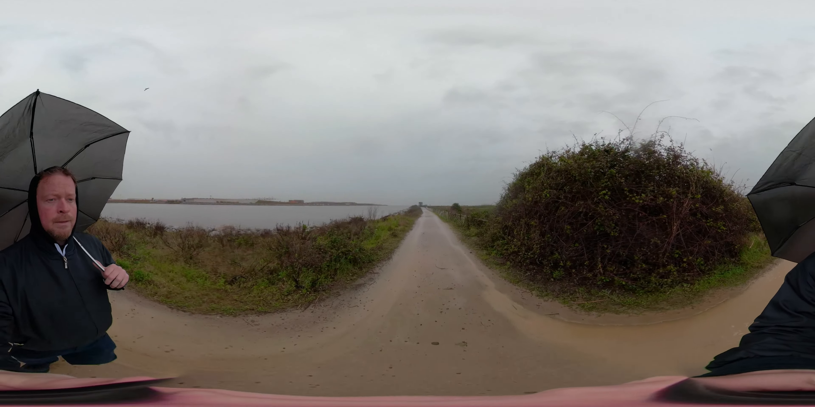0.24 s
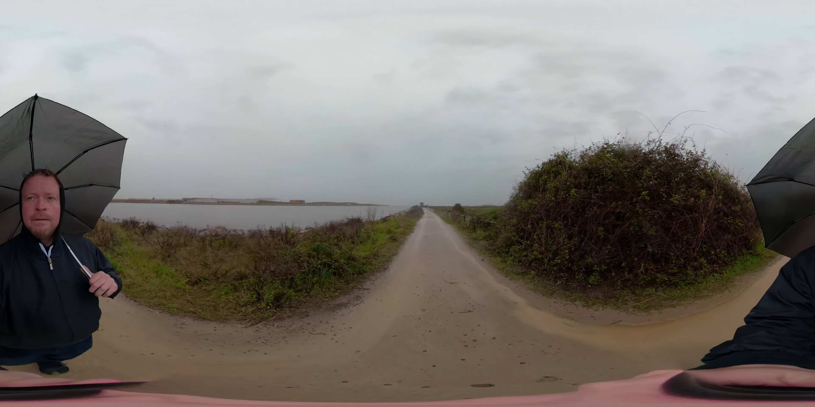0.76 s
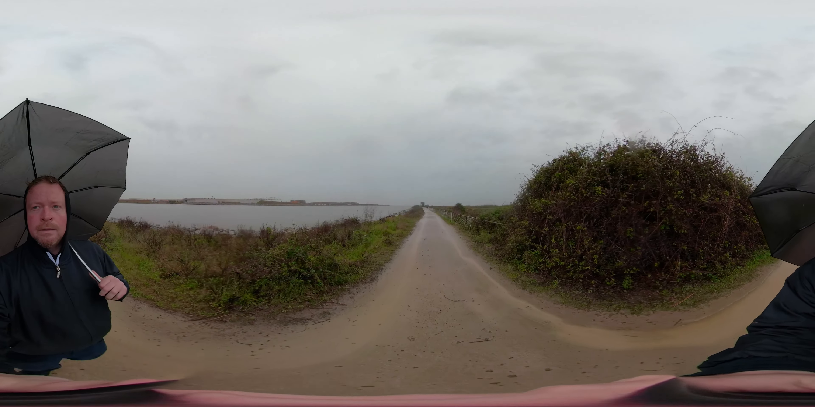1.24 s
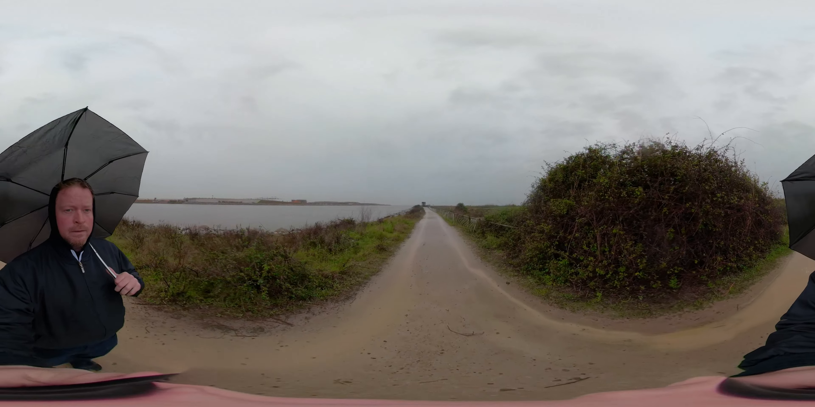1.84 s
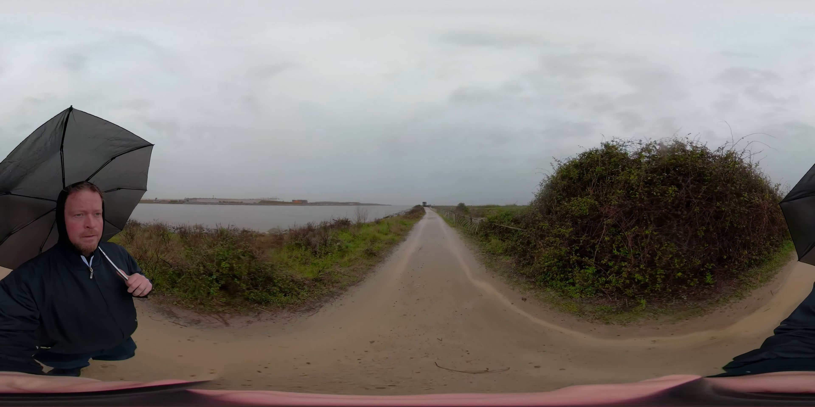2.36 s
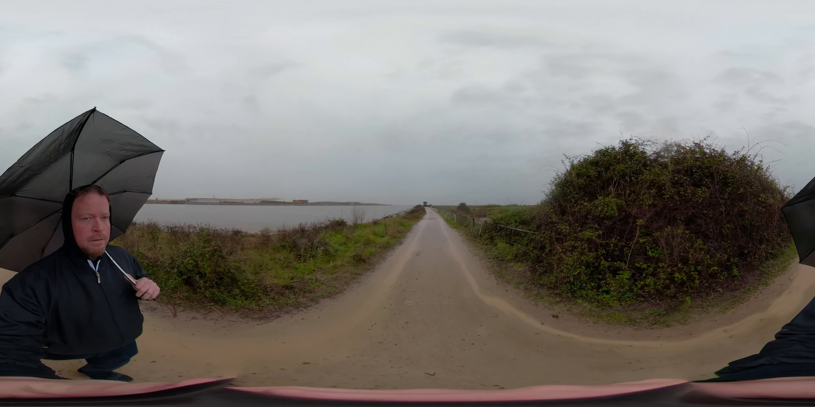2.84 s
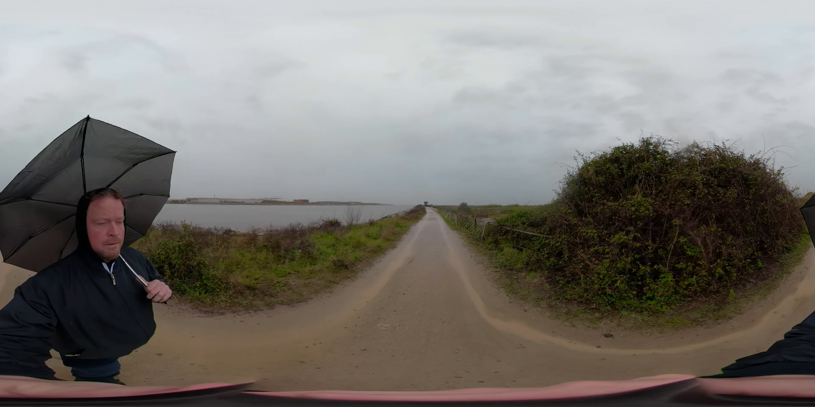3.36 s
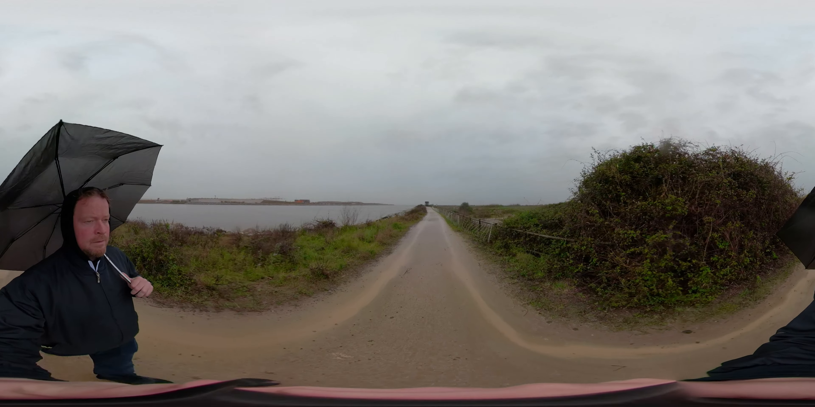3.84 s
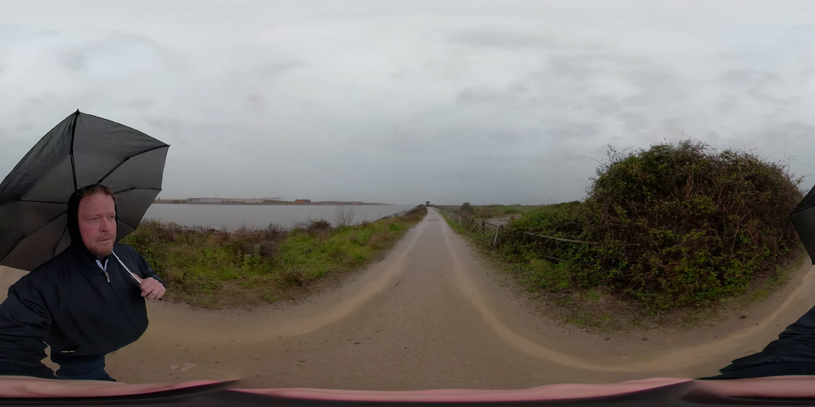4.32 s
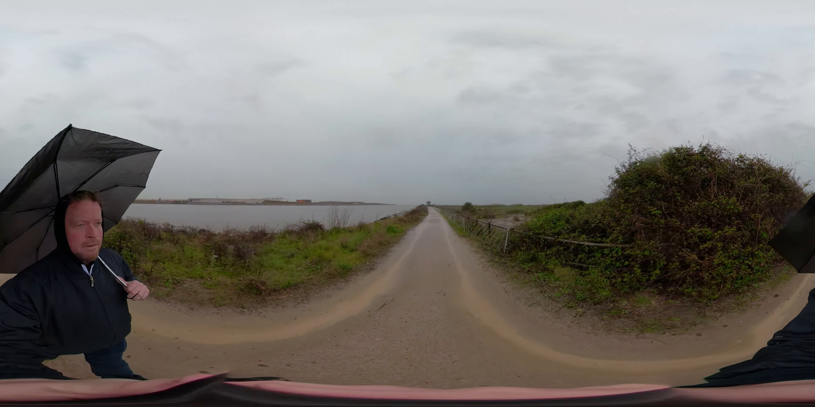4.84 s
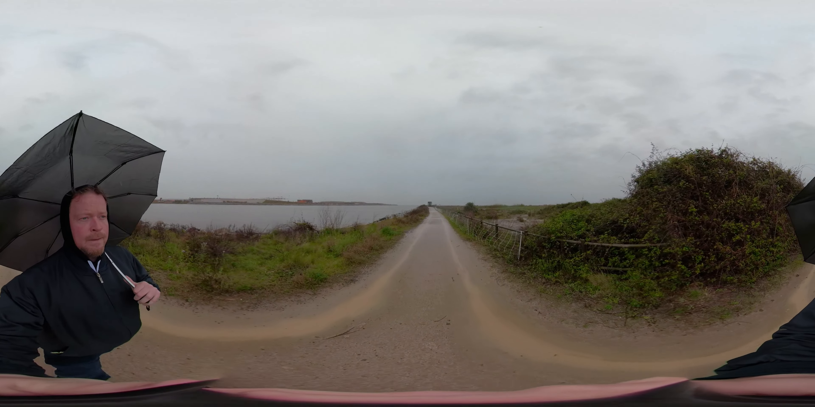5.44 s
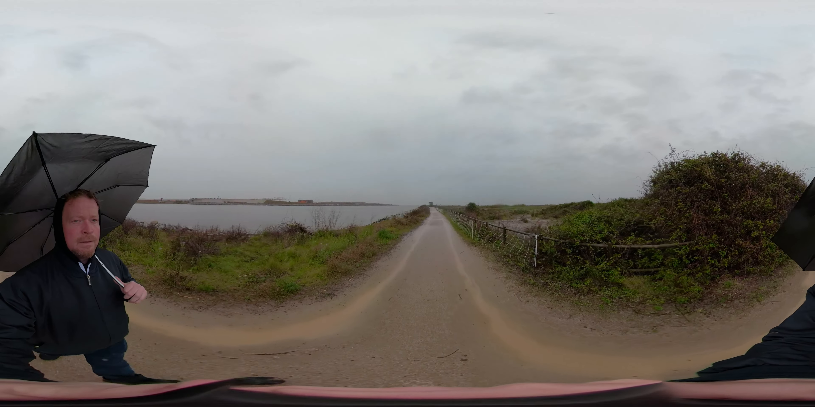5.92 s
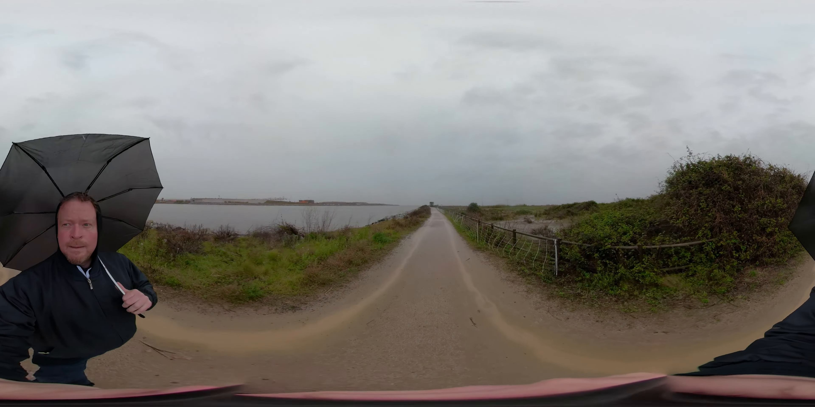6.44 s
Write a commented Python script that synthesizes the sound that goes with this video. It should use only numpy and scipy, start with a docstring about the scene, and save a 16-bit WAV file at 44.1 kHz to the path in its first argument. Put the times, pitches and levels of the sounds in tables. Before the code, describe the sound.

Raindrops tap on a close umbrella over low wind and faint steps, dulling to a patter after one soft bump.

```python
"""A walk by the water under an umbrella, in light rain. From the start the wet ground hisses, far wind
and water make a soft wash, wind rumbles on the microphone and the stretched canopy drones.
Drops tick on the cloth, and shoes scuff softly as they crush the wet sand of the track.
A little after five seconds comes one soft bump and the umbrella is turned:
the ticks dull into a patter, and the rumble grows as the microphone loses its shelter."""
import sys
import numpy as np
from scipy import signal
from scipy.fft import rfft, irfft
from scipy.io import wavfile
from scipy.ndimage import uniform_filter1d

SR = 44100
rng = np.random.default_rng(int(sys.argv[2]) if len(sys.argv) > 2 else 0)


def generate_wav(sig):
    """Save sig (samples, or channels by samples) to the path in sys.argv[1] as 16-bit PCM at SR."""
    pcm = np.round(np.clip(np.atleast_2d(sig).T, -1, 1) * 32767).astype(np.int16)
    wavfile.write(sys.argv[1], SR, pcm)


N = 294588
TIME = np.arange(N) / SR

# how far the umbrella is turned: (time [s], share of a full turn [0-1])
TURN_SHARE = [(0, 0.01), (5.3, 0.04), (5.6, 0.47), (5.85, 0.7), (6.68, 0.82)]
# a full turn lifts the middle pitches and takes away treble: (frequency [Hz], change [dB])
TURN_COLOUR = [(500, 2), (2000, 4), (3000, 6), (3700, 2.5), (4600, -9.5), (5500, -20.5), (6500, -22.5),
               (7500, -30), (8500, -26), (11000, -23), (12400, -4.5), (14000, -15)]


def gain_of(db):
    """Turns decibels into a factor to multiply a sound by."""
    return 10 ** (np.asarray(db) / 20)


def unit_level(x):
    """Scales a signal to an average (rms) size of 1."""
    return x / np.sqrt(np.mean(x ** 2) + 1e-20)


def at_hz(rows, hz):
    """Reads a table between its frequencies, on a scale of octaves."""
    row_hz, value = np.transpose(rows)
    return np.interp(np.log(hz + 1), np.log(row_hz + 1), value)


def at_time(rows, t):
    """Reads a table between its times, along straight lines."""
    return np.interp(t, *np.transpose(rows))


def add(mix, start_s, sound):
    """Adds a sound into the mix at its start time."""
    part = mix[max(round(start_s * SR), 0):][:len(sound)]
    part += sound[:len(part)]


def turned(t):
    """How far the umbrella is turned at these times, as a column."""
    return at_time(TURN_SHARE, t)[:, None]


def patches(grid, frames, bands):
    """Blurs a random grid of time and frequency into soft patches."""
    return unit_level(uniform_filter1d(uniform_filter1d(grid, frames, axis=0), bands, axis=1))


def noise(colour, patchy_db, size):
    """Noise with the tone colour given by colour(t, hz) in dB, plus random louder and softer patches."""
    hop = size // 4
    t, hz = np.arange(N // hop + 5) * hop / SR, np.fft.rfftfreq(size, 1 / SR)
    real, imag, grid = rng.standard_normal((3, len(t), len(hz)))
    spectrum = (real + 1j * imag) * gain_of(colour(t, hz) + patchy_db * patches(grid, 10, 8))
    return unit_level(signal.istft(spectrum.T, nperseg=size, noverlap=size - hop)[1][:N])


def steadied(x, size):
    """Evens out the slow swells of a noise."""
    return x / np.sqrt(uniform_filter1d(x ** 2, size=size) + 1e-9)


def ground_hiss(db=1, turn_db=2.5):
    """Rain on the track and bushes, so far off that the drops blend into a hiss."""
    # tone colour of the hiss: (frequency [Hz], relative level [dB])
    colour = [(800, -17.5), (2000, -4), (3000, -5.5), (4300, -10.5), (5000, -5), (5600, 3.5), (6400, -7),
              (7200, -2), (8000, -17.5), (8800, -24.5), (12300, -24.5), (13300, -61)]
    # its slow rise and fall: (time [s], relative level [dB])
    level = [(0, -73.5), (1, -72), (2, -73), (3, -72.5), (4, -71.5), (5.2, -72), (5.8, -75), (6.68, -70)]
    hiss = noise(lambda t, hz: at_hz(colour, hz) + turned(t) * at_hz(TURN_COLOUR, hz), patchy_db=2, size=512)
    level_db = db + at_time(level, TIME) + turn_db * at_time(TURN_SHARE, TIME)
    return steadied(hiss, size=4000) * gain_of(level_db)


def far_wash(db=1.5, hump_db=4, hump_octaves=0.51):
    """Far wind and water blend into a wash, with a louder band that drifts in pitch."""
    # tone colour of the wash: (frequency [Hz], relative level [dB])
    colour = [(100, 1.5), (300, -2), (550, 1.5), (900, -0.5), (1500, -4.5), (2100, -14.5), (3000, -25.5),
              (5000, -69.5), (9000, -85)]
    # its slow rise and fall: (time [s], relative level [dB])
    level = [(0, -57.5), (0.65, -56.5), (1.47, -60), (2.7, -60.5), (3.6, -60), (5.5, -61.5), (6.68, -58)]
    # middle of the louder band: (time [s], frequency [Hz])
    hump_pitch = [(0, 990), (1, 1200), (2, 1350), (2.6, 910), (3.1, 806), (5, 860), (6.68, 654)]

    def drifting_colour(t, hz):
        octaves = np.log2((hz + 1) / at_time(hump_pitch, t)[:, None])
        return at_hz(colour, hz) + hump_db * np.exp(-(octaves / hump_octaves) ** 2)
    return noise(drifting_colour, patchy_db=1.3, size=1024) * gain_of(db + at_time(level, TIME))


def wind(rumble_db=-46, flutter_db=-50, turn_rumble_db=4, turn_flutter_db=5):
    """Swirls of air buffet the microphone, harder once the turned canopy stops sheltering it."""
    # the deep rumble: (frequency [Hz], relative level [dB])
    rumble_colour = [(10, -7), (25, 2), (40, 9.5), (52, 15), (68, 9.5), (90, 6), (130, -7), (250, -61),
                     (1000, -120)]
    # the flutter above it: (frequency [Hz], relative level [dB])
    flutter_colour = [(50, -8), (95, -1), (125, -5.5), (160, -5), (220, -12.5), (320, -19), (500, -25.5),
                      (1000, -50), (5000, -120)]
    # strength of the breeze: (time [s], relative level [dB])
    breeze = [(0, 1.5), (.6, 0), (1.3, 1), (2.4, 0), (3.5, 0), (5.4, -1.5), (6, 2), (6.68, 0)]
    rumble = noise(lambda t, hz: at_hz(rumble_colour, hz), patchy_db=3.5, size=8192)
    flutter = noise(lambda t, hz: at_hz(flutter_colour, hz), patchy_db=2, size=2048)
    turn = at_time(TURN_SHARE, TIME)
    rumble = steadied(rumble, size=18000) * gain_of(rumble_db + turn_rumble_db * turn)
    flutter = steadied(flutter, size=8000) * gain_of(flutter_db + turn_flutter_db * turn)
    return (rumble + flutter) * gain_of(at_time(breeze, TIME))


def canopy_drone(db=-1, note_hz=78.2, width_hz=3.5):
    """Wind and rain keep the stretched canopy ringing at its lowest note, like a drum skin."""
    # strength of the drone: (time [s], relative level [dB])
    level = [(0, -45), (.7, -50), (1.4, -48.5), (2.1, -42.5), (3.2, -47), (4.4, -41), (5.2, -41.5),
             (5.5, -45), (6.68, -43.5)]
    ring = noise(lambda t, hz: -20 * np.log10(1 + ((hz - note_hz) / width_hz) ** 2),
                 patchy_db=-0.5, size=16384)
    return steadied(ring, size=6000) * gain_of(db + at_time(level, TIME))


def drops_on_cloth(drops, sharpness, sharp_spread=0.75, tilt_db=3, uneven_db=2.2,
                   ring_db=5, ring_width_hz=550, dull_db=4):
    """Each drop makes a bright tick and a dull pat, then ripples briefly across the cloth."""
    # the tick, as the drop hits: (frequency [Hz], relative level [dB])
    tick_colour = [(1500, -39.5), (3000, -11), (4300, -9), (5100, 1), (6400, -0.5), (7300, -1),
                   (8000, -8.5), (8700, -20), (10500, -22.5), (12500, -23), (14000, -35.5), (16000, -61)]
    # the pat, as the cloth gives way: (frequency [Hz], relative level [dB])
    pat_colour = [(100, -10.5), (300, -7), (700, 3.5), (1100, 2), (1500, 6.5), (2200, 1), (3000, -2.5),
                  (4200, -12), (6000, -39), (10000, -58.5)]
    # extra treble of a drop that lands squarely: (frequency [Hz], boost per step of sharpness [dB])
    square_hit = [(8000, 1), (10000, 1.5), (13000, 3.5), (16000, 9)]
    times, tick_db, pat_db, ring_hz = np.transpose(drops)
    size, lead = 512, 96  # samples per drop, and how many come before the hit
    hz, age = np.fft.rfftfreq(size, 1 / SR), (np.arange(size) - lead) / SR
    chance = rng.standard_normal((len(times), 2, size))
    ripples = chance * (age > 0)
    octaves = np.log2(np.clip(hz, 700, 9000) / 3000)
    # tight and slack spots sound brighter or duller, each with its own peaks and dips
    tilt = tilt_db * chance[:, 0, :1] * octaves
    uneven = uneven_db * unit_level(uniform_filter1d(chance[:, 1, :len(hz)], size=22, axis=1))
    treble = (sharpness + sharp_spread * chance[:, 0, 1:2]) * at_hz(square_hit, hz)
    spot_db = tilt + uneven + treble + turned(times) * at_hz(TURN_COLOUR, hz)
    ring = ring_db / (1 + ((hz - ring_hz[:, None]) / ring_width_hz) ** 2)
    dulling = dull_db * turned(times) * octaves

    def hit(colour_db, ripple, peak_db, fade_s):
        click = (age == 0) + ripple * np.exp(-abs(age) / fade_s)
        wave = irfft(rfft(click) * gain_of(colour_db + spot_db))
        return wave * (gain_of(peak_db) / abs(wave).max(axis=1))[:, None]

    ticks = hit(at_hz(tick_colour, hz) + ring, 0.04 * ripples[:, 0], tick_db, fade_s=0.0016)
    pats = hit(at_hz(pat_colour, hz) - dulling, 0.075 * ripples[:, 1], pat_db, fade_s=0.0022)
    out = np.zeros(N)
    for hit_s, wave in zip(times, (ticks + pats) * signal.windows.tukey(size, 0.2)):
        add(out, hit_s - lead / SR, wave)
    return out


def fine_rain(per_s=180, least_db=-62, spread_db=9, range_db=21,
              pat_db=-6, vary_db=12, turn_tick_db=-11.5, turn_pat_db=6):
    """Many small drops land all over the canopy; the larger they are, the rarer."""
    # strength of the fine rain: (time [s], relative level [dB])
    shower = [(0, 4.5), (.7, 3), (1.4, 2), (2, 1.5), (2.7, -2), (3.3, -1.5), (3.7, 3), (4.4, 4), (5.5, 5),
              (5.9, 3), (6.68, 6)]
    when, chance, size, tone, pitch = rng.random((4000, 5)).T
    times = when * N / SR
    reach = 1 - np.exp(-range_db / spread_db)  # caps the size of a drop
    level = least_db - spread_db * np.log(1 - reach * size) + at_time(shower, times)
    turn = at_time(TURN_SHARE, times)
    tick_level = level + turn_tick_db * turn
    pat_level = level + pat_db + turn_pat_db * turn + vary_db * (tone - 0.5)
    ring_hz = 5100 + 1900 * pitch ** 2
    drops = np.transpose([times, tick_level, pat_level, ring_hz])
    lands = chance < per_s * N / SR / len(times)
    return drops_on_cloth(drops[lands], sharpness=-0.8)


def canopy_push(pace_s):
    """The canopy is pushed in and swings back more slowly: one lopsided wave."""
    progress = np.arange(2500) / SR / pace_s
    wave = np.gradient(progress ** 3 * np.exp(-progress))
    return wave / wave.max()


def large_drops(thud_db=-7, thud_s=0.00085, hollow_db=-10, hollow_hz=800, hollow_s=0.0059):
    """Big, close drops dent the cloth with a small thud, and ring hollow once it is turned."""
    # the big drops: (time [s], tick level [dB], pat level [dB], pitch of the tick's ring [Hz])
    drops = [(0.036, -36, -34.5, 5760), (0.1144, -33, -36.5, 5500), (0.121, -36, -40, 5600),
             (0.193, -35, -48, 5900), (0.5025, -15, -24.5, 5540), (0.7755, -37.5, -40.5, 6200),
             (0.8512, -34, -38.5, 6740), (0.893, -33, -45, 5500), (1.2968, -36.5, -37.5, 5300),
             (1.382, -34.5, -34.5, 6100), (1.4299, -38, -39, 5300), (1.5181, -35, -45, 5700),
             (1.5597, -31.5, -39, 6040), (1.8191, -37.5, -41.5, 5900), (1.8682, -28, -36, 6340),
             (2.9654, -37.5, -47, 6000), (2.9998, -38, -40, 5800), (3.0276, -24, -39, 6100),
             (3.1216, -39, -43, 5400), (3.5284, -33.5, -37.5, 5700), (3.6171, -39, -42, 5600),
             (3.8253, -34, -41, 5900), (3.9131, -38, -35, 5500), (4.5227, -39, -45, 6600),
             (4.7519, -36.5, -41, 6500), (4.964, -33, -40, 5900), (5.0129, -35.5, -47, 5400),
             (5.1575, -29, -37.5, 5700), (5.1772, -35, -40.5, 6600), (5.2016, -29.5, -47, 5500),
             (5.243, -37, -39, 6200), (5.4671, -40.5, -40.5, 5200), (5.6086, -39.5, -57, 6900),
             (6.253, -42.5, -33.5, 5200), (6.4282, -49, -38.5, 4660), (6.6163, -37.5, -30, 5130)]
    out = drops_on_cloth(drops, sharpness=0.1, sharp_spread=0.3, tilt_db=1.5, uneven_db=1)
    age = np.arange(2500) / SR
    hollow = np.exp(-age / hollow_s) * np.sin(2 * np.pi * hollow_hz * age)
    for hit_s, _, pat_db, _ in drops:
        add(out, hit_s, -gain_of(pat_db + thud_db) * canopy_push(thud_s))
        add(out, hit_s, at_time(TURN_SHARE, hit_s) * gain_of(pat_db + hollow_db) * hollow)
    return out


def footsteps(grains_per_s=3000, spread_db=5, patchy_db=3):
    """Each sole crushes clumps of wet sand; the tiny clicks of the grains swell into a scuff."""
    # the steps: (time [s], level [dB], half length [s])
    steps = [(0.083, -59, 0.022), (0.63, -63, 0.03), (1.19, -58.5, 0.04), (1.708, -59.5, 0.016),
             (2.317, -65, 0.07), (2.808, -56, 0.026), (3.416, -60, 0.043), (3.89, -62.5, 0.044),
             (4.454, -69, 0.025), (4.944, -69, 0.035), (5.517, -65, 0.029), (6.1, -64, 0.057),
             (6.638, -69, 0.044)]
    # sand under a shoe: (frequency [Hz], relative level [dB])
    sand_colour = [(500, -17), (1500, 3.5), (2800, -2), (4300, -9), (5500, 2), (7200, -4.5), (8000, -12),
                   (8800, -25.5), (12500, -23.5), (13500, -54)]
    clicks = (rng.random(N) < grains_per_s / SR) * rng.standard_normal(N)
    grains = clicks * gain_of(spread_db * rng.standard_normal(N))
    hz, t, spectrum = signal.stft(grains, SR, nperseg=256)
    clumps = patches(rng.standard_normal(spectrum.T.shape), frames=4, bands=6)
    colour = gain_of(at_hz(sand_colour, hz) + turned(t) * at_hz(TURN_COLOUR, hz) + patchy_db * clumps)
    crunch = unit_level(signal.istft(spectrum * colour.T, SR, nperseg=256)[1][:N])
    swells = sum(gain_of(db) * np.exp(-((TIME - step_s) / half_s) ** 2 / 2) for step_s, db, half_s in steps)
    return crunch * swells


def handle_bump(start_s=5.2239, push_db=-18.5, push_s=0.0014, knock_db=-35, knock_hz=1100, knock_s=0.00051):
    """A small knock on the handle, then one slower push of the whole canopy."""
    age = TIME - start_s + 0.0012  # the knock comes just ahead of the push
    out = gain_of(knock_db) * np.exp(-(age / knock_s) ** 2) * np.cos(2 * np.pi * knock_hz * age)
    add(out, start_s, gain_of(push_db) * canopy_push(push_s))
    return out


def scene():
    """Steps, drops and one bump over the steady background, in one channel."""
    background = ground_hiss() + far_wash() + wind() + canopy_drone()
    return (background + footsteps() + fine_rain() + large_drops() + handle_bump())[None]


def record(dry, top_hz=16000):
    """Softens the start and the stop, and cuts the very highest treble."""
    faded = dry * signal.windows.tukey(N, 300 / N)
    low_pass = signal.firwin(255, top_hz, window=("kaiser", 9), fs=SR)
    return signal.oaconvolve(faded, low_pass[None], "same")


dry = scene()
out = record(dry)
generate_wav(out)
```